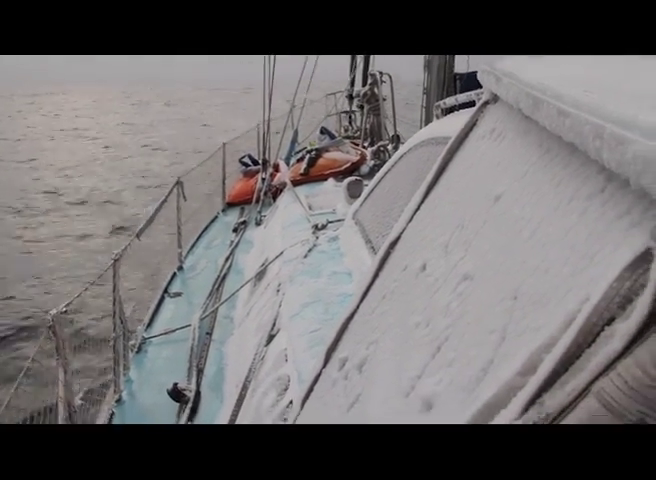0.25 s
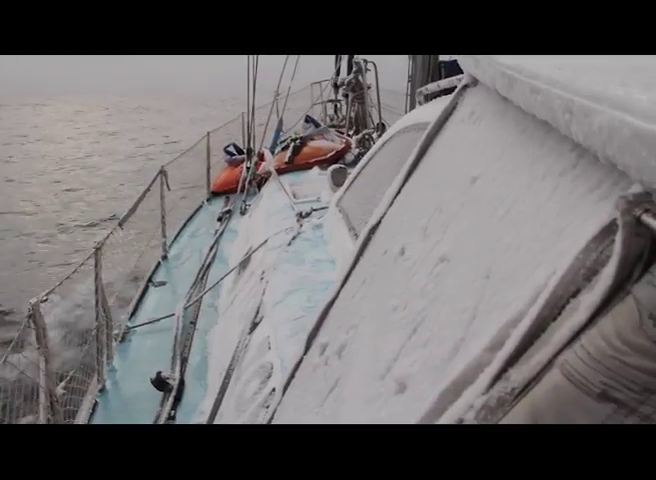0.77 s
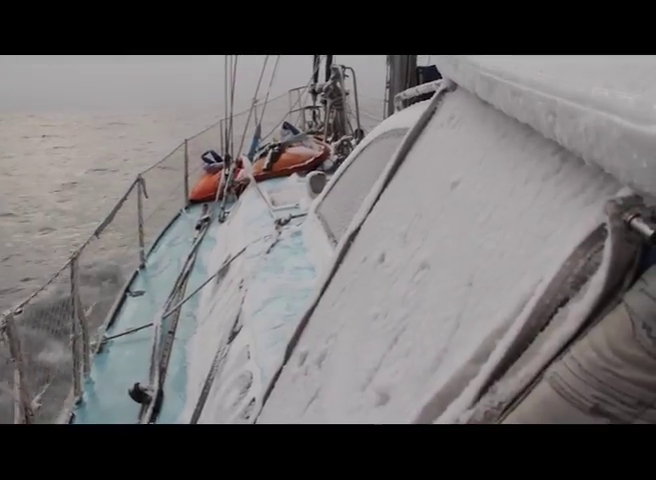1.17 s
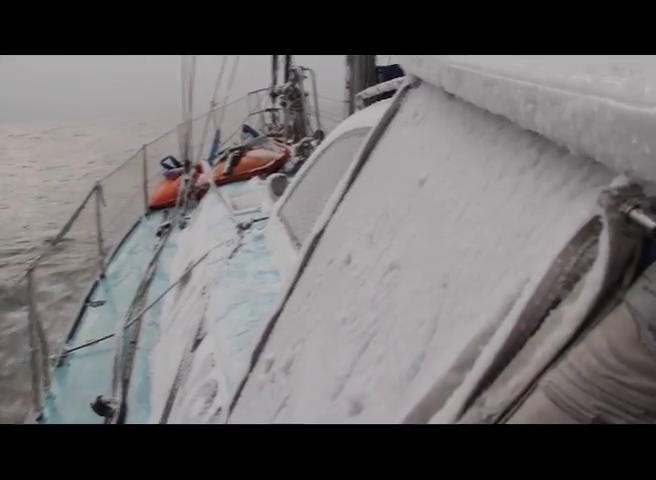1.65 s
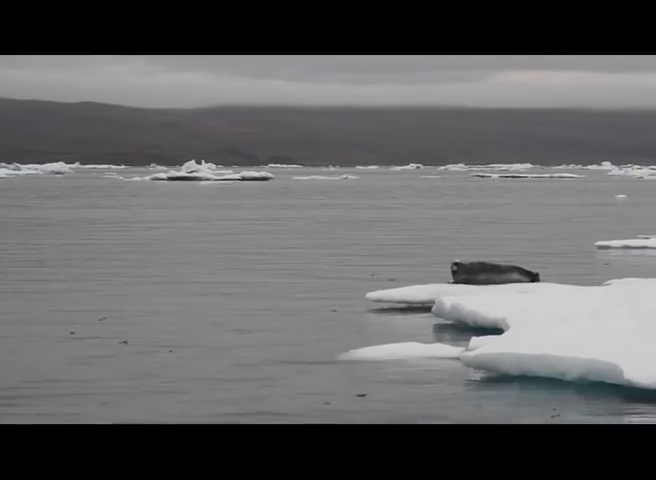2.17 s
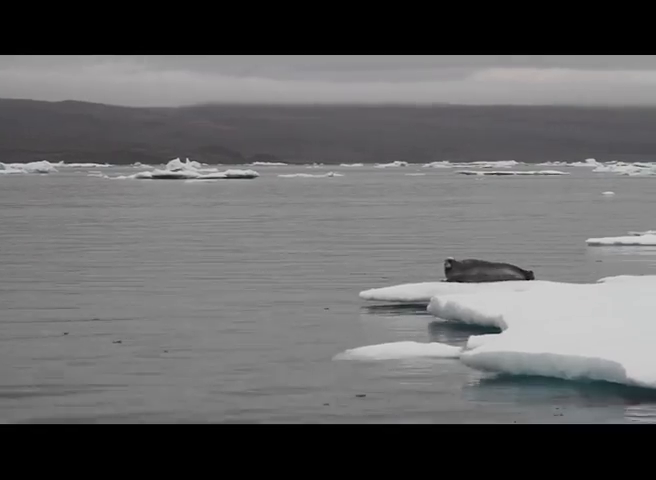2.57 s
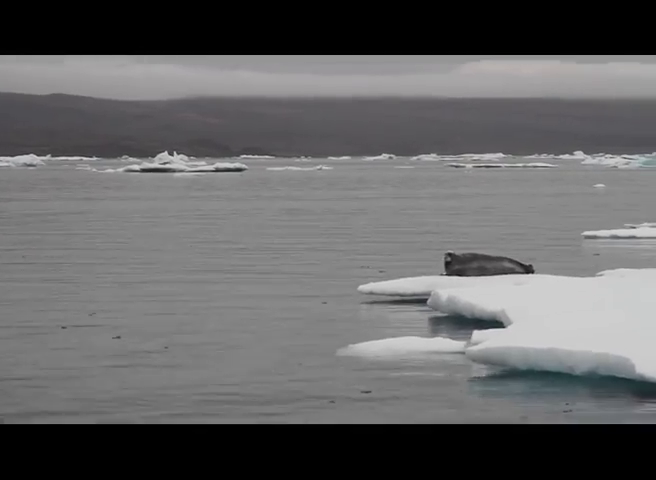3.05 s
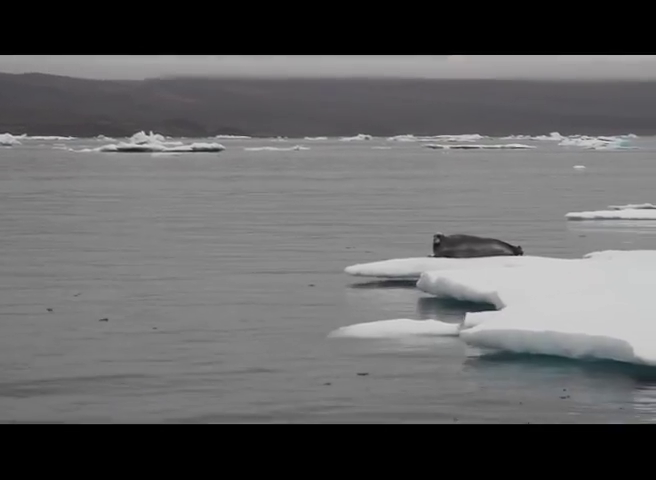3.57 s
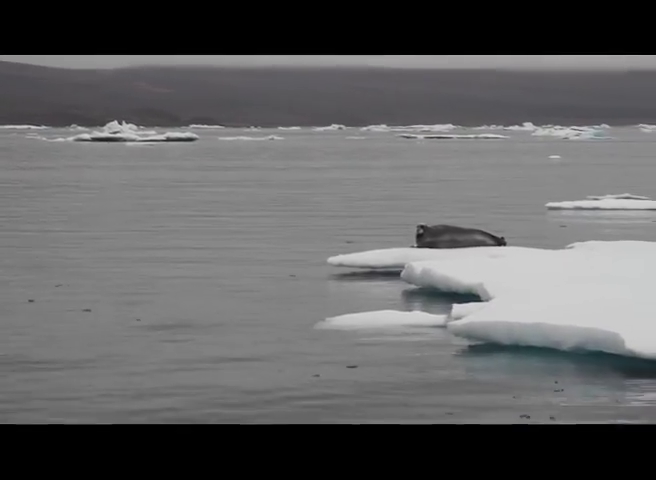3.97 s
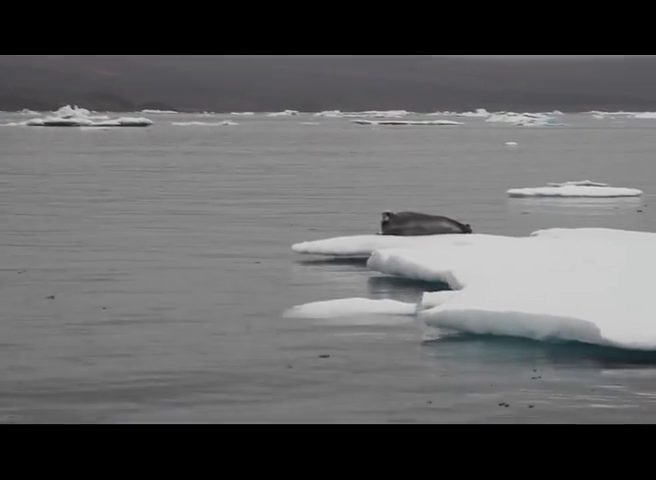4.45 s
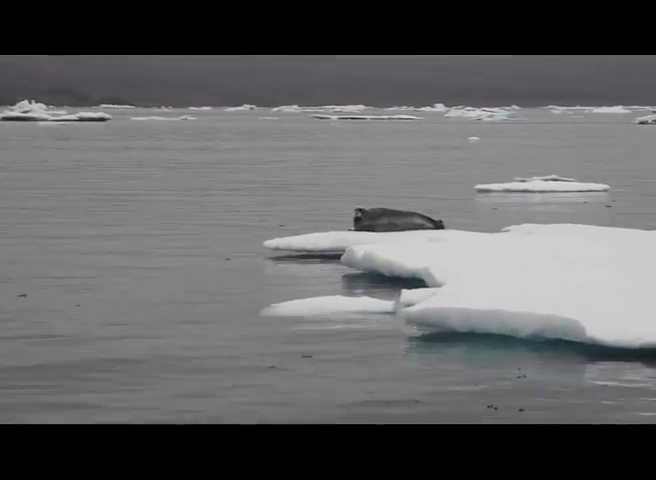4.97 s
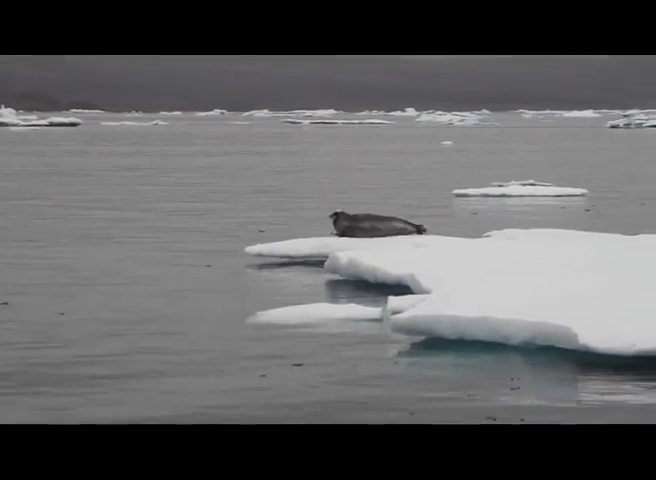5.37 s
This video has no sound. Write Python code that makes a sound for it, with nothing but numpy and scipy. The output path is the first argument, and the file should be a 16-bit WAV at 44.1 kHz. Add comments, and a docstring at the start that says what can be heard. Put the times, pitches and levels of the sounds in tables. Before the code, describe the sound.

For the first second, wind buffets the microphone on a sailing boat with quick, low thumps, the loudest sounds here. A wave hisses and fizzes along the hull, spitting sharp drops of spray, over a faint low hum. The gusts weaken after 1 second, and from about 1.6 to 2.3 seconds wind and wave fade out.

A much quieter, calm anchorage fades in from around 2 seconds and stays until the end, near 5.6 seconds. The hull gives a soft, hollow drone while ripples lap, with scattered drips and ticks. Brief gurgles come at about 2.8, 3.7 and 4.4 seconds. Dull knocks make the hull ring briefly near 2.8 and 4.2 seconds, then several more follow between 4.5 and 5.1, the strongest at 4.8. A barely audible, very high whine wavers throughout.

```python
"""Windy sailing, then a calm anchorage.

Wind buffets a microphone on a sailing boat: each swirl of air gives it one short push. A wave hisses
and spits along the hull, over a low hum. This fades out and a calm anchorage fades in: a hollow drone
from the hull, lapping water, drips, gurgles and ticks, and a few dull knocks that make the hull ring.
A thin whine sits near the top of hearing."""
import sys
import numpy as np
from scipy import signal
from scipy.io import wavfile
from scipy.ndimage import uniform_filter1d

SR = 44100
rng = np.random.default_rng(int(sys.argv[2]) if len(sys.argv) > 2 else 0)


def store_pcm(level_fs):
    """Save levels as 16-bit WAV."""
    pcm = np.round(np.clip(level_fs, -1, 1) * 32767).astype(np.int16)
    wavfile.write(sys.argv[1], SR, np.atleast_2d(pcm).T)


N = 247817
TIME = np.arange(N) / SR

# How the thin whine wavers: time_s, pure_tone_db, fuzz_db
WHINE_LEVELS = [(0, -68, -95), (1.9, -87, -96), (2.5, -68, -90), (3.1, -71, -86), (3.3, -78, -80),
                (4.4, -76, -73), (4.7, -92, -75), (5.2, -72, -78), (5.62, -69, -77)]
# How the drone and the lapping fade in: time_s, gain_db
CALM_FADE_IN = [(1.85, -6), (2.05, -14.5), (2.22, -12), (2.31, -5), (2.8, 0.5), (5.62, -.5)]
# The drone, from bass to treble: pitch_hz, relative_db
DRONE_TONE = [(18, -47), (30, -2.5), (167, -10.5), (248, -9), (305, -4.5), (386, -10), (660, -5.5),
              (849, -13), (1300, -15.5), (1690, -23.5), (2860, -120)]
# Pitches that the hollow hull makes louder: pitch_hz, width_hz, boost_db
HULL_RINGS = [(184.4, 66, 11.5), (313.8, 24.3, 12), (447, 100, 5), (522, 8.4, 4), (673, 14.5, 5)]
# How the lapping swells and eases, before its fade-in: time_s, level_db
LAP_LEVELS = [(1.85, -50), (2.55, -55.5), (2.9, -55.5), (3.2, -57), (3.7, -53), (4.15, -55.5),
              (4.45, -52.5), (4.62, -56), (5.2, -54.5), (5.62, -55)]
# The hiss of the ripples, from low to high: pitch_hz, relative_db
LAP_TONE = [(470, -48), (800, -12), (862, -8), (1450, -2.5), (2070, -4.5), (2290, -2.5), (2820, -7),
            (3700, -8.5), (4130, -11.5), (8670, -17.5), (11400, -15), (14700, -22.5), (15300, -21)]
# Faint steady colour in that hiss: pitch_hz, width_hz, boost_db
LAP_RINGS = [(2310, 120, 1.5), (2550, 73, 1), (3640, 89, -0.5), (10200, 250, 2.5)]
# Short gurgling gushes of water: start_s, length_s, level_db, first_hz, last_hz, width_hz
GUSHES = [(2.331, 0.23, -63, 4070, 4600, 1000), (2.427, 0.083, -62.5, 8450, 9000, 5000),
          (2.836, 0.044, -47, 2080, 2000, 800), (2.828, 0.047, -54, 3300, 3000, 3000),
          (2.83, 0.052, -46, 1006, 906, 1190), (2.927, 0.041, -57, 9450, 9000, 7000),
          (3.685, 0.039, -50.5, 1713, 1760, 1190), (3.785, 0.085, -61, 4500, 6540, 1500),
          (4.407, 0.082, -53, 1233, 2300, 1000)]
# Drops of spray, drips and ticks: start_s, peak_db, pitch_hz, ring_cycles
DROPS = [(.075, -21, 10200, 5.4), (.0986, -30, 6900, 9.1), (.1178, -27, 8350, 7.4), (0.4937, -24, 2950, 22),
         (.5894, -23.5, 5930, 4.1), (1.08, -20.5, 6860, 6), (1.1087, -14, 8150, 4.7),
         (1.2319, -20, 9400, 6.4), (1.262, -17, 3500, 3), (1.289, -17, 10500, 9.1),
         (1.3743, -26, 13330, 12), (1.465, -27, 4960, 7.6), (1.5854, -34, 11500, 6.9),
         (1.829, -36, 5800, 8.3), (2.2976, -49, 11400, 14), (2.299, -45, 704, 10.5), (2.319, -48, 1990, 18),
         (2.329, -49, 3860, 39), (2.469, -44, 4280, 19), (2.6222, -43, 2650, 4.7), (2.644, -51, 4100, 21),
         (2.724, -50, 4000, 8), (2.85, -39, 2140, 14), (2.877, -47, 4700, 14), (2.9147, -46, 11400, 18.4),
         (2.937, -37.5, 6260, 9.3), (2.939, -33, 11000, 5), (3.072, -38.5, 860, 11),
         (3.1394, -45, 7100, 5.2), (3.217, -40, 660, 13), (3.365, -34, 5500, 2.2), (3.705, -37, 550, 9),
         (3.717, -42.5, 3650, 22), (3.8418, -50, 6700, 9.8), (3.9589, -51, 7800, 16),
         (4.0086, -36, 3450, 3.8), (4.045, -39.5, 2200, 9), (4.069, -40, 1370, 8), (4.201, -46, 2970, 16),
         (4.232, -48, 2900, 17), (4.3165, -32.5, 6200, 2.1), (4.348, -47, 5420, 18),
         (4.787, -37, 4570, 0.74), (4.865, -42, 1410, 13), (5.052, -51, 4080, 22), (5.134, -49, 3670, 28),
         (5.139, -42, 1370, 12), (5.1758, -42, 10000, 4.2), (5.188, -32.5, 8700, 1.1),
         (5.316, -41.5, 4450, 30), (5.35, -45, 3000, 12), (5.355, -41, 1670, 10), (5.405, -29.5, 11500, 2),
         (5.406, -38, 4800, 5), (5.491, -36, 523, 10)]
# Dull knocks through the hull: start_s, peak_db, pitch_factor, length_factor
KNOCKS = [(2.458, -47, 0.86, 1.2), (2.831, -33.5, 0.64, 1.1), (4.158, -32, 0.87, 0.87),
          (4.554, -36.5, 1.5, 2.3), (4.799, -24, 0.98, 0.69), (4.813, -34, 0.905, 1.1),
          (5.052, -38.5, 1.24, 2.6), (5.088, -32.5, 0.77, 0.96)]
# The notes in a knock, before its factors: pitch_hz, relative_db, ring_s (time to fall 60 dB)
KNOCK_NOTES = [(161, -13.5, 0.13), (218, 2, 0.066), (409, -5.5, 0.07), (550, -14, 0.11)]
# The passing wave, before the fade-out: time_s, level_db
WAVE_LEVELS = [(0, -35), (.13, -35), (.57, -32.5), (.6, -29), (.68, -31.5), (.73, -30), (.82, -27.5),
               (.88, -31), (.99, -27.5), (1.21, -31), (1.25, -27), (1.39, -34), (1.57, -33), (2.3, -34.5)]
# The hiss of the wave, from bass to treble: pitch_hz, relative_db
WAVE_TONE = [(50, -45), (90, 2), (200, -6), (330, -6.5), (500, -8.5), (1170, -8.5), (2500, -11.5),
             (3900, -13.5), (7000, -20), (11400, -16.5), (13500, -21.5), (15800, -31)]
# Gusts that carry the small swirls of air, before the fade-out: start_s, hold_s, level_db
GUSTS = [(0, .06, -26.5), (0.048, 0.051, -16.5), (0.158, 0.044, -24.5), (0.239, .03, -22),
         (0.301, 0.047, -21), (0.386, 0.022, -25.5), (.53, 0.11, -26), (0.691, 0.063, -22.5),
         (0.804, .11, -24.5), (0.932, 0.02, -18), (1.008, 0.019, -26), (1.12, 0.036, -34.5),
         (1.33, 0.017, -35), (1.56, 0.088, -35), (1.679, 0.099, -30), (1.903, .02, -29.5)]
# The strongest swirls, which thump the microphone, before the fade-out: middle_s, level_db, pitch_hz
THUMPS = [(.011, -10.5, 213), (.028, -6, 225), (.058, -8, 250), (.068, -12, 283), (.087, -1, 237),
          (.11, -6.5, 318), (0.158, -8, 235), (.176, -6.5, 199), (.226, -11, 300), (.258, -9.5, 222),
          (0.296, -13, 187), (.323, -8.5, 280), (.338, -5, 205), (.537, -14.5, 208), (.614, -13.5, 360),
          (.624, -10.5, 251), (.683, -11.5, 180), (.717, -12, 296), (.742, -12.5, 280), (0.824, -7.5, 182),
          (0.854, -13, 180), (.926, -10, 230), (.935, -4.5, 380), (0.949, -9, 230), (.96, -.5, 307),
          (1.007, -7, 208), (1.12, -16.5, 236), (1.158, -19.5, 244), (1.341, -19.5, 200), (1.569, -18, 153),
          (1.637, -21, 170), (1.692, -14, 151), (1.721, -16.5, 200)]

FADE_START_S, FADE_END_S = 1.576, 2.29  # when the wind and the wave fade out


def gain_of(db):
    """Turn decibels into a number to multiply by."""
    return 10 ** (np.asarray(db) / 20)


def normalize(sound):
    """Scale a sound so that its average power is 1."""
    return sound / np.sqrt(np.mean(sound ** 2) + 1e-20)


def tone_at(table, hz):
    """Look up the level in dB at these pitches."""
    pitches, levels = np.transpose(table)
    return np.interp(np.log(hz + 1), np.log(pitches + 1), levels)


def boost_at(rings, hz):
    """The dB that ringing adds at these pitches."""
    return sum(db / (1 + ((hz - pitch) / (width / 2)) ** 2) for pitch, width, db in rings)


def loudness(table, column=1):
    """Turn a column of dB into a gain over time, silent outside the table's times."""
    rows = np.array(table)
    return gain_of(np.interp(TIME, rows[:, 0], rows[:, column], left=-120, right=-120))


def add(mix, start_s, sound):
    """Mix in a short sound."""
    part = mix[max(round(start_s * SR), 0):][:len(sound)]
    part += sound[:len(part)]


def blip(hz, cycles, phase):
    """A brief wiggle that swells and fades, pushing and pulling equally."""
    turns = np.arange(-cycles, cycles, hz / SR)
    bell = np.exp(-(2.14 * turns / cycles) ** 2)
    wiggle = bell * np.cos(2 * np.pi * (turns + phase))
    return wiggle - bell * wiggle.sum() / bell.sum()


def random_blips(per_s, range_hz, cycles, spread_db, kinds, tone=((1, 0), (9, 0))):
    """Blips at random times, a few of them loud; each kind has its own pitch."""
    sizes = gain_of(spread_db * np.minimum(rng.exponential(1, N), 3))
    hits = sizes * (rng.random(N) < per_s / SR)
    kind, phases = rng.integers(0, kinds, N), rng.random(kinds)
    out = np.zeros(N)
    for k, hz in enumerate(np.geomspace(*range_hz, kinds)):
        blips = signal.oaconvolve(hits * (kind == k), blip(hz, cycles, phases[k]), "same")
        out += gain_of(tone_at(tone, hz)) * blips
    return normalize(out)


def noise(tone_db, frame_size, flicker_db, patchy_db=1.0, moving_db=None):
    """Shaped noise: patches of pitch drift in level, and the whole sound flickers."""
    hop = frame_size // 4
    frames = N // hop + 5
    hz, t = np.fft.rfftfreq(frame_size, 1 / SR), np.arange(frames) * hop / SR
    real, imag, patches = rng.standard_normal((frames, len(hz), 3)).T
    patches = normalize(uniform_filter1d(uniform_filter1d(patches, 8, 0), 12, 1))
    flicker = normalize(uniform_filter1d(rng.standard_normal(frames), 3))
    level_db = tone_db(hz)[:, None] + patchy_db * patches + flicker_db * flicker
    if moving_db:
        level_db += moving_db(hz, t)
    spectrum = (real + 1j * imag) * gain_of(level_db)
    _, sound = signal.istft(spectrum, nperseg=frame_size, noverlap=frame_size - hop)
    return normalize(sound[:N])


def whine(pitch_hz=15687, fuzz_hz=15480):
    """A very high pure tone, with a fuzzy band of noise just below it."""
    pure = np.sqrt(2) * np.sin(2 * np.pi * pitch_hz * TIME)
    fuzz = noise(lambda hz: -12 * ((hz - fuzz_hz) / 150) ** 2, 1024, flicker_db=1.5, patchy_db=2.5)
    return loudness(WHINE_LEVELS) * pure + loudness(WHINE_LEVELS, column=2) * fuzz


def hum(pitch_hz=70, sag_db_per_s=25, end_s=2.03):
    """A low pure tone under the wave; it sags late and stops."""
    level = gain_of(-46.5 - sag_db_per_s * np.maximum(TIME - FADE_START_S, 0))
    stop = np.clip((end_s - TIME) / 0.036, 0, 1)
    return level * stop * np.sqrt(2) * np.sin(2 * np.pi * pitch_hz * TIME)


def hull_drone():
    """Low noise, louder at the pitches where the hull rings."""
    rumble = noise(lambda hz: tone_at(DRONE_TONE, hz) + boost_at(HULL_RINGS, hz), 2048, flicker_db=.8)
    return gain_of(-45.5) * rumble


def lapping():
    """Ripples hiss softly among small bubbles and chance drips, the high ones fainter."""
    hiss = noise(lambda hz: tone_at(LAP_TONE, hz) + boost_at(LAP_RINGS, hz), 512, flicker_db=1.5)
    bubbles = random_blips(400, (900, 12000), cycles=11, spread_db=2.5, kinds=40,
                           tone=[(900, 0), (12000, -19)])
    drips = random_blips(30, (1500, 7000), cycles=11, spread_db=6.5, kinds=12,
                         tone=[(1500, 0), (7000, -9)])
    return loudness(LAP_LEVELS) * (hiss + gain_of(-10) * bubbles + gain_of(-14) * drips)


def gushes():
    """Water gurgles: lumpy noise around a sliding pitch, starting and ending softly."""
    out = np.zeros(N)
    for start_s, length_s, db, first_hz, last_hz, width_hz in GUSHES:
        size = round(length_s * SR)
        real, imag, lumps = rng.standard_normal((size, 3)).T
        band = uniform_filter1d(real + 1j * imag, max(round(SR / width_hz), 2))
        band *= gain_of(3.1 * normalize(uniform_filter1d(lumps, 150)))
        slide = np.exp(2j * np.pi * np.cumsum(np.linspace(first_hz, last_hz, size)) / SR)
        gurgle = normalize((band * slide).real)
        add(out, start_s, gain_of(db) * gurgle * signal.windows.tukey(size, .6))
    return out


def drops(echo_s=.015):
    """Each drop rings briefly, rising a little in pitch; hull and water scatter the sound."""
    out = np.zeros(N)
    scatters = rng.standard_normal((len(DROPS), 700)) * gain_of(-60 * np.arange(700) / SR / echo_s)
    for (start_s, db, hz, cycles), scatter in zip(DROPS, scatters):
        turns = np.arange(0, 3 * cycles, hz / SR)
        age = turns / cycles
        rise_and_fall = (1 - np.exp(-age / 0.024)) * np.exp(-2.4 * age)
        ring = rise_and_fall * np.sin(2 * np.pi * turns * (1 + 0.015 * age))
        direct_and_echoes = np.append(1, .6 * scatter / np.linalg.norm(scatter))
        ring = np.convolve(ring, direct_and_echoes)
        add(out, start_s, gain_of(db) * ring / abs(ring).max())
    return out


def knocks(rise_s=0.0062):
    """Each knock rings the hull's few short notes, shifted in pitch and length."""
    out, t = np.zeros(N), np.arange(SR // 4) / SR
    for start_s, db, pitch, length in KNOCKS:
        ring = sum(gain_of(note_db - 60 * t / (ring_s * length)) * np.sin(2 * np.pi * hz * pitch * t)
                   for hz, note_db, ring_s in KNOCK_NOTES)
        ring *= 1 - np.exp(-t / rise_s)
        add(out, start_s, gain_of(db) * ring / abs(ring).max())
    return out


def foam_db(hz, t, db_per_s=3.5):
    """The treble of the wave grows as it breaks into foam."""
    treble_share = np.clip(np.log2((hz[:, None] + 1) / 2500), -1, 2) / 2
    return treble_share * (-4.5 + db_per_s * np.minimum(t, FADE_END_S))


def wave():
    """A wide hiss of water along the hull, and a fizz of bursting bubbles."""
    hiss = noise(lambda hz: tone_at(WAVE_TONE, hz), 512, flicker_db=1.03, moving_db=foam_db)
    fizz = random_blips(500, (1200, 12000), cycles=5.4, spread_db=5.0, kinds=14)
    return loudness(WAVE_LEVELS) * (hiss + gain_of(-10.5) * fizz)


def gusts(rise_db_per_s=305, fall_db_per_s=226, lull_db=-42.5):
    """The wind's strength: each gust rises quickly, holds and dies down into the lull."""
    level_db = np.full(N, lull_db)
    for start_s, hold_s, db in GUSTS:
        before_s, after_s = np.maximum(start_s - TIME, 0), np.maximum(TIME - start_s - hold_s, 0)
        level_db = np.maximum(level_db, db - rise_db_per_s * before_s - fall_db_per_s * after_s)
    return gain_of(level_db)


def wind():
    """Each swirl of air pushes the microphone for about one cycle, with no ring after it."""
    out = gusts() * random_blips(per_s=220, range_hz=(97, 615), cycles=1.03, spread_db=2.0, kinds=12)
    for (middle_s, db, hz), phase in zip(THUMPS, rng.random(len(THUMPS))):
        thump = blip(hz, cycles=0.89, phase=phase)
        snap = blip(hz * 2.2, cycles=0.81, phase=phase)  # the thump's sharp edge
        add(out, middle_s - len(thump) / 2 / SR, gain_of(db) * thump)
        add(out, middle_s - len(snap) / 2 / SR, gain_of(db - 16) * snap)
    return out


def fade_out(db_per_s=48.5, closing_s=0.19):
    """The level falls steadily, then closes to silence."""
    fall = gain_of(-db_per_s * np.maximum(TIME - FADE_START_S, 0))
    return fall * np.clip((FADE_END_S - TIME) / closing_s, 0, 1)


def scene():
    """Sailing gives way to the calm anchorage, in one channel."""
    sailing = fade_out() * (wind() + wave()) + hum()
    calm = loudness(CALM_FADE_IN) * (hull_drone() + lapping())
    return (sailing + calm + gushes() + drops() + knocks() + whine())[None]


def record(dry, lowest_hz=60, highest_hz=15750):
    """The microphone cuts the deepest bass and clips at full scale; then the top treble is cut."""
    thin = signal.sosfilt(signal.butter(3, lowest_hz, "high", fs=SR, output="sos"), dry)
    clipped = np.clip(thin, -1, 1)
    treble_cut = signal.firwin(2047, highest_hz, window=("kaiser", 9), fs=SR)
    return signal.oaconvolve(clipped, treble_cut[None], "same")


dry = scene()
out = record(dry)
store_pcm(out)
```